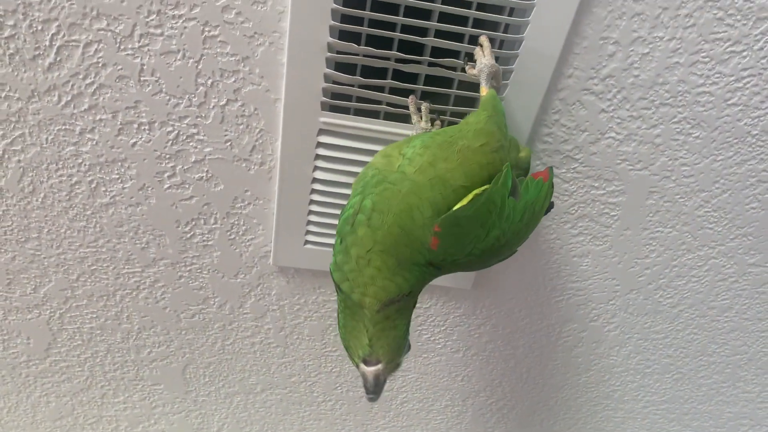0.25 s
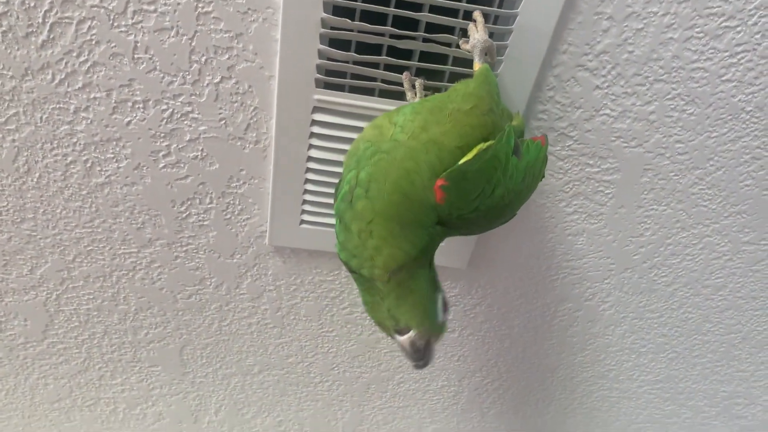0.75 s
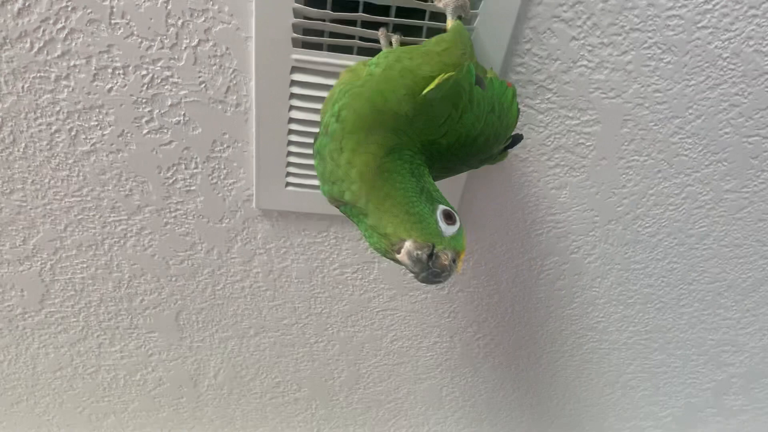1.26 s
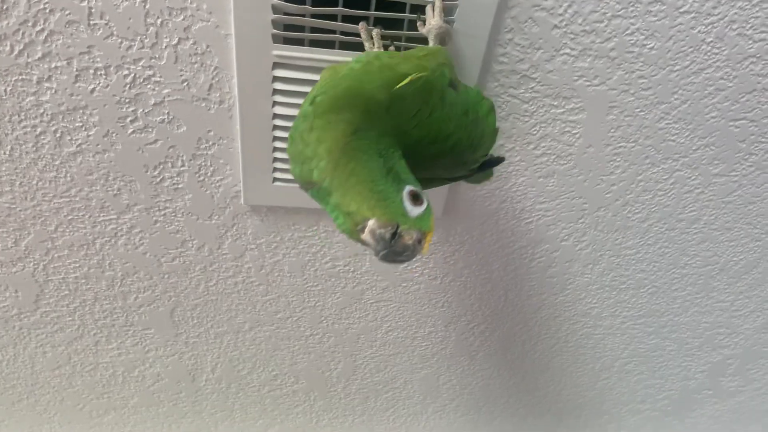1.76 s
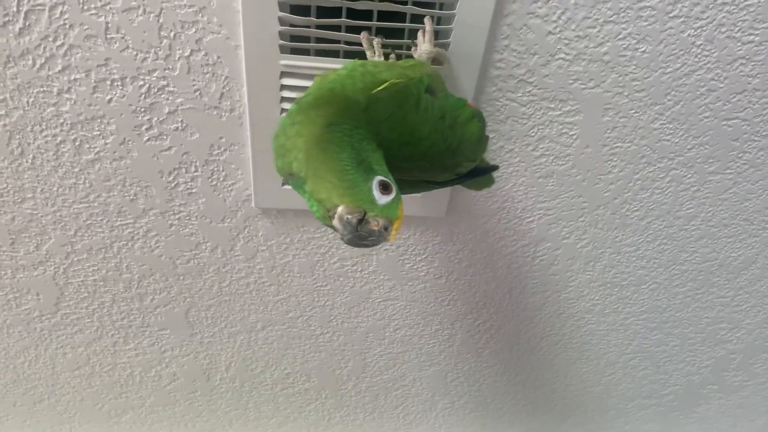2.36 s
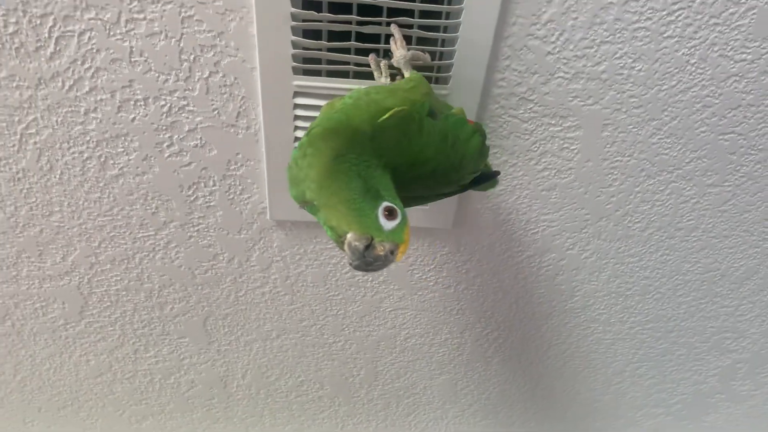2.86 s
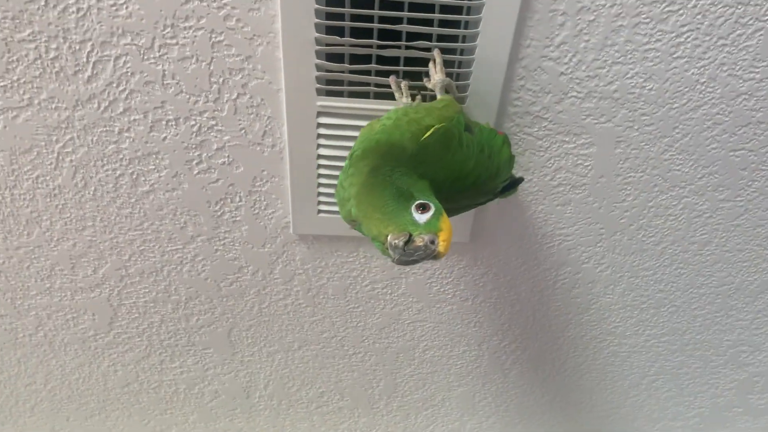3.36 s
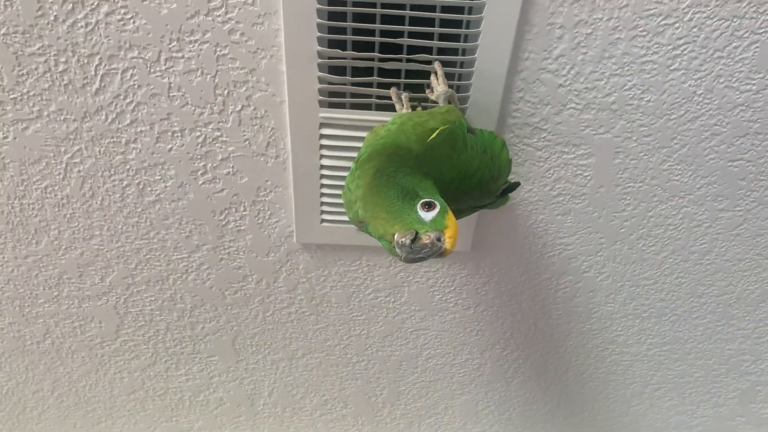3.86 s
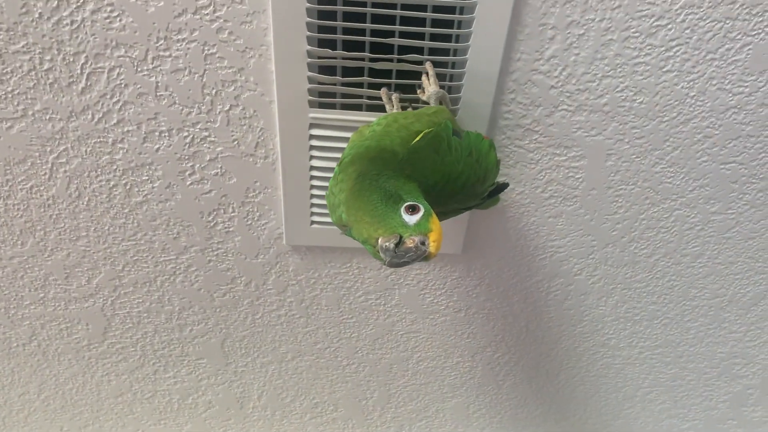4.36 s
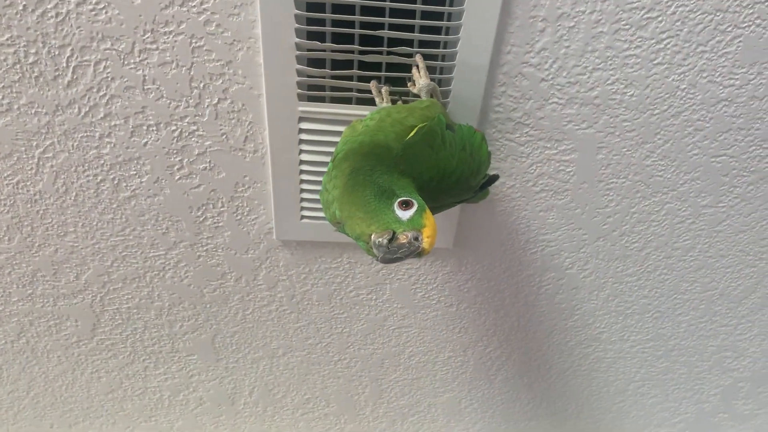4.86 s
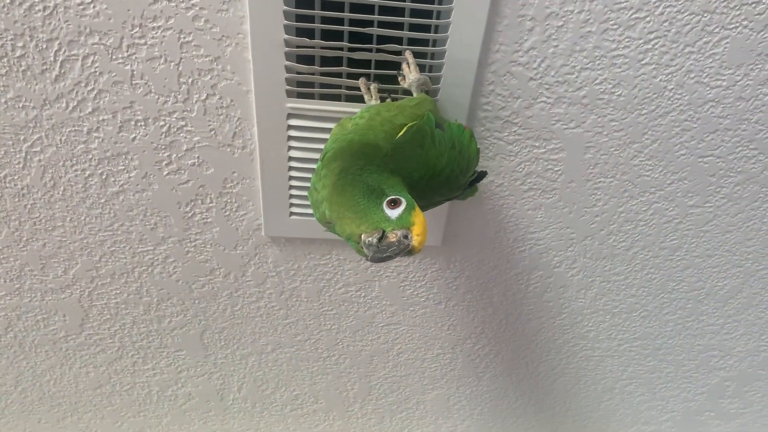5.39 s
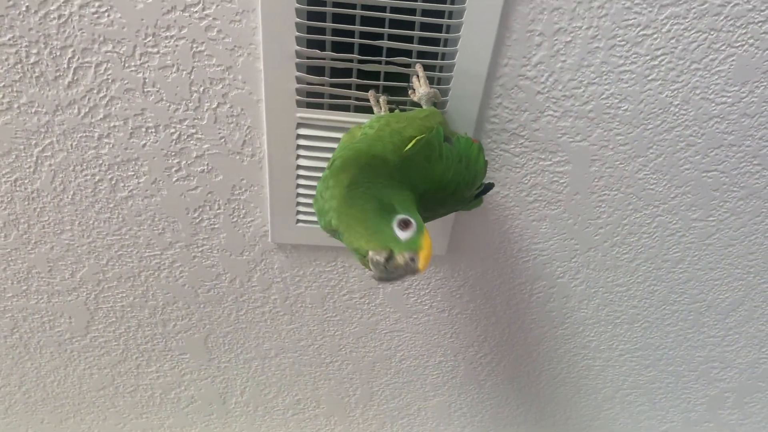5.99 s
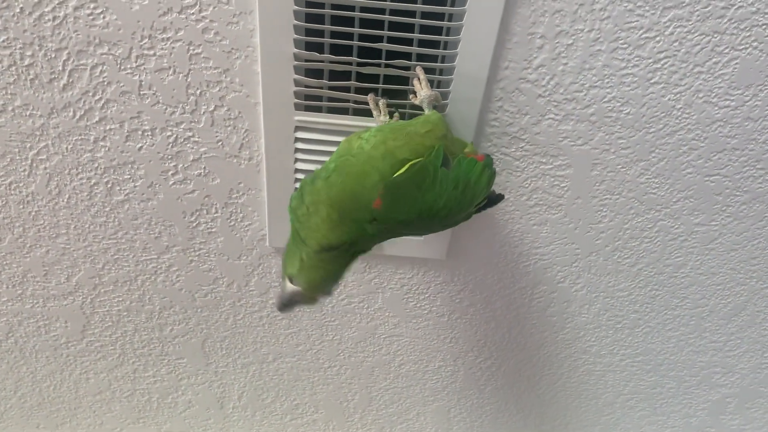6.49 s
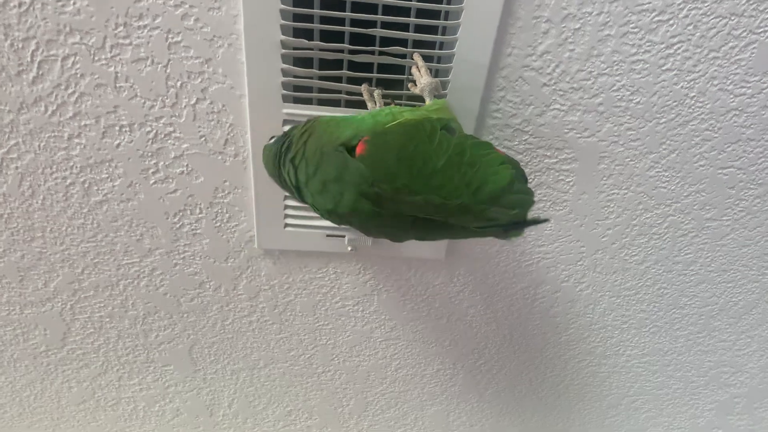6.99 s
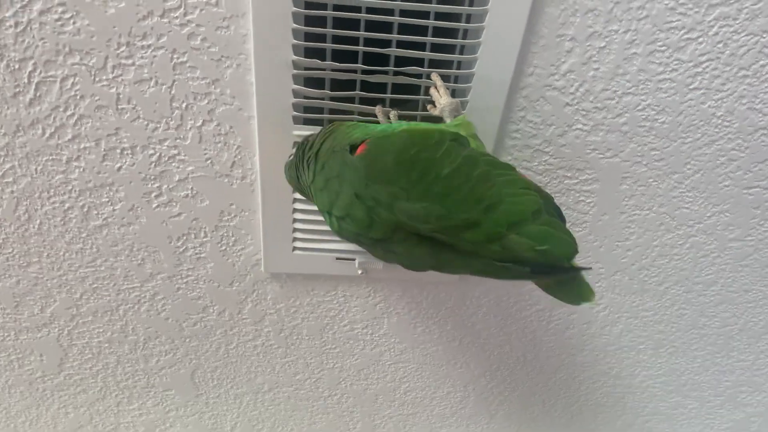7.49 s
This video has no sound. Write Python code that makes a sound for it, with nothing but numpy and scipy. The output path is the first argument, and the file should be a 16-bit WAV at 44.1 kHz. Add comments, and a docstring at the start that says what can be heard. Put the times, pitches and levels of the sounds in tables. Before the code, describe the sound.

A parrot's claws scrape, squeak and snap on a thin metal vent grille in a quiet room, then a fluttering rustle and dull bumps.

```python
"""Mains hum and the still air of a quiet room run throughout, under a parrot on a metal ceiling vent grille.
For the first 3.3 s its claws scrape along the bars and snap off them; the thin metal and the room ring briefly.
From 3.6 s to about 5.2 s a fluttering rustle passes, then come one more slide and a hard snap.
After 7 s there are dull bumps, light ticks and softer scrapes. A bump comes early too, near 1.7 s,
and a plucked bar sings faintly near 2 s and 5.3 s. Noise makes the contacts; tuned filters make the metal."""
import sys
import numpy as np
from scipy import signal
from scipy.fft import rfft, irfft, next_fast_len
from scipy.io import wavfile

SR = 44100
rng = np.random.default_rng(int(sys.argv[2]) if len(sys.argv) > 2 else 0)


def wav_record(signal):
    """Record a signal, one row per channel, as 16-bit PCM in the file named by sys.argv[1]."""
    frames = np.transpose(np.atleast_2d(signal))
    bounded = np.clip(frames, -1, 1)
    # unit amplitude maps onto the largest positive 16-bit level
    quanta = np.round(bounded * 32767).astype(np.int16)
    wavfile.write(sys.argv[1], SR, quanta)


N = 341334
TIME = np.arange(N) / SR


def from_db(db):
    """Turn decibels into a gain."""
    return 10 ** (np.asarray(db) / 20)


def rms_one(x):
    """Scale a sound to an rms level of 1."""
    return x / np.sqrt(np.mean(x ** 2) + 1e-20)


def at_hz(points, hz):
    """Read a table between its points, on a log-frequency axis."""
    f, value = np.transpose(points)
    return np.interp(np.log(hz + 0.0013), np.log(f), value)


def bins(size):
    """List the frequencies of a real FFT in Hz."""
    return np.fft.rfftfreq(size, 1 / SR)


def colour(x, *spectra):
    """Shape a noise by the sum of some dB spectra; the result has rms 1."""
    length = x.shape[-1]
    size = next_fast_len(length)
    gain = from_db(sum(at_hz(spectrum, bins(size)) for spectrum in spectra))
    return rms_one(irfft(rfft(x, size) * gain, size)[:, :length])


def noise(size):
    """Two unrelated noises: the sound both channels share, and the part in which they differ."""
    return rng.standard_normal((2, size))


def drift(per_s, size):
    """Wander in straight lines between random values of spread 1, drawn per_s times a second."""
    knots = rng.standard_normal(int(size / SR * per_s) + 3)
    return np.interp(np.arange(size) / SR * per_s, np.arange(len(knots)), knots)


def add(out, s, x):
    """Mix x into out from time s (seconds)."""
    i = max(round(s * SR), 0)
    out[:, i:i + x.shape[-1]] += x[..., :N - i]


# mains hum, before its waver: multiple of the mains frequency [1], level/dB rms
HUM_LINES = [(1, -55), (2, -65.5), (3, -64), (4, -82), (5, -86.5), (7, -85)]
# colour of the still air: f/Hz, level/dB per Hz
AIR_COLOUR = [(20, -17), (45, 0), (110, 3.5), (220, -4), (400, -11.5), (700, -20), (1400, -22),
              (3500, -27.5), (7000, -30.5), (15600, -33.5), (16300, -43.5)]
AIR_DB, MAINS_HZ = -67.5, 60


def background(waver_db=.7):
    """Mains hum is a stack of sines whose higher lines waver more; still air is a steady coloured noise."""
    out = from_db(AIR_DB) * colour(noise(N), AIR_COLOUR)
    for multiple, db in HUM_LINES:
        level = from_db(db + waver_db * multiple * drift(17, N))
        phase = 2 * np.pi * (round(multiple) * MAINS_HZ * TIME + rng.random())
        out[0] += np.sqrt(2) * level * np.sin(phase)   # sqrt(2): from rms to peak
    return out


# strength of the rustle, before its gains: t/s, rumble level/dB, hiss level/dB
RUSTLE_STRENGTH = [(3.68,-50.5,-62.5), (3.97,-51,-62), (4.17,-50.5,-55.5), (4.38,-49.5,-57),
                   (4.49,-56,-65.5), (4.6,-55,-60.5), (5.15,-60.5,-70)]
# colour of its low part: f/Hz, level/dB per Hz
RUMBLE_COLOUR = [(20, -15), (45, 3.5), (70, 3), (130, -11), (330, -10.5), (700, -18), (1500, -20),
                 (3500, -28), (6000, -68)]
# colour of its high part: f/Hz, level/dB per Hz
HISS_COLOUR = [(900, -10.5), (1800, 1.5), (3500, -0.5), (6000, -2), (8000, -10), (15000, -2.5),
               (16500, -20)]
# the gap between swells grows a little as the rustle dies away
RUSTLE_START_S, SWELL_GAP_S, SWELL_SLOWING_S = 3.68, 0.0917, 0.0012
# it sets in abruptly, one swell before its first peak
RUSTLE_ATTACK_S = 0.016


def rustle(rumble_gain_db=1.4, hiss_gain_db=0, hiss_width_s=0.047, lump_db=2.5, grain_db=1.5, count=15):
    """A lumpy rumble under a fine hiss; both swell about ten times a second, the rumble more broadly."""
    k, strength = np.arange(count), np.transpose(RUSTLE_STRENGTH)
    t = TIME[::40]   # a coarse clock is enough for slow swells
    peaks_s = RUSTLE_START_S + SWELL_GAP_S * k + SWELL_SLOWING_S * k ** 2

    def swells(column, width):
        """Add the power of all swells, each a smooth hump around its peak."""
        levels = np.interp(peaks_s, strength[0], strength[column])
        power = sum(from_db(2 * db) / (1 + ((t - s) / width) ** 2) ** 3 for s, db in zip(peaks_s, levels))
        onset = np.clip((t - RUSTLE_START_S + SWELL_GAP_S) / RUSTLE_ATTACK_S + .5, 0, 1)
        return np.interp(TIME, t, onset * np.sqrt(power))

    lumps = from_db(rumble_gain_db + lump_db * drift(60, N))
    rumble = colour(noise(N), RUMBLE_COLOUR) * swells(1, 1.5 * hiss_width_s) * lumps
    grain = from_db(hiss_gain_db + grain_db * drift(300, N))
    hiss = colour(noise(N), HISS_COLOUR) * swells(2, hiss_width_s) * grain
    return rumble + hiss


# dull bumps, before the tone and noise gains: t/s, knock level/dB, thud level/dB
DULL_BUMPS = [(1.695,-60.5,-46.5), (7.072,-38.5,-34), (7.165,-50.5,-43.5), (7.333,-51,-38),
              (7.44,-47.5,-42)]
# the hollow knock of the whole vent: f/Hz, level/dB against the knock, time to fade by 60 dB [s]
VENT_KNOCK = [(248, 0.5, .15), (905, -9.5, .22)]
# colour of the noise in a bump: multiple of its pitch [1], level/dB
THUD_COLOUR = [(.5, -8), (1, 0), (1.5, -6), (2.2, -22), (10, -55)]
THUD_DELAY_S, THUD_HZ, THUD_T60_S = .02, 83, .091


def bumps(tone_db=-2, dull_db=-6, rise_s=0.0049):
    """Soft, heavy contacts: fading sines and dull noise give a hollow knock, then a deeper thud."""
    out, t = np.zeros((2, N)), TIME[:SR // 4]
    for s, knock_db, thud_db in DULL_BUMPS:
        parts = [(0, hz, knock_db + db, t60) for hz, db, t60 in VENT_KNOCK]
        parts.append((THUD_DELAY_S, THUD_HZ, thud_db, THUD_T60_S))
        for delay, hz, db, t60 in parts:
            shape = from_db(db - 60 * t / t60) * (1 - np.exp(-t / rise_s))
            dull = colour(noise(len(t)), np.array(THUD_COLOUR) * [hz, 1])
            add(out, s + delay, from_db(dull_db) * shape * dull)
            add(out[:1], s + delay, from_db(tone_db) * shape * np.sin(2 * np.pi * hz * t))
    return out


# a claw plucks a loose bar: t/s, pitch f/Hz, level/dB before its flutter
BAR_PLUCKS = [(1.858, 1010, -66), (2.079, 1018, -67), (5.15, 1115, -66), (5.392, 1095, -60)]
# modes of that bar: multiple of its pitch [1], level/dB, time to fade by 60 dB [s]
LOOSE_BAR_MODES = [(1, 0, 1.1), (1.29, -3, .4), (1.87, -2, .4)]
GRIP_CHANGES_PER_S = 50


def plucks(flutter_db=3, waver=.006):
    """A plucked bar rings on unsteadily as the grip on it changes; its upper modes die first."""
    out, t = np.zeros((2, N)), TIME[:SR]
    for s, hz, db in BAR_PLUCKS:
        for multiple, mode_db, t60 in LOOSE_BAR_MODES:
            bend, flutter = drift(GRIP_CHANGES_PER_S, SR), drift(GRIP_CHANGES_PER_S, SR)
            phase = 2 * np.pi * np.cumsum(multiple * hz * (1 + waver * bend)) / SR
            level = from_db(db + mode_db + flutter_db * flutter - 60 * t / t60)
            add(out[:1], s, level * np.sin(phase))
    return out


# colour of any contact with the grille: f/Hz, level/dB per Hz
CONTACT_COLOUR = [(150, 4), (300, -5.5), (560, -4.5), (1000, 0), (1700, -1.5), (2700, 3.5), (4000, -1),
                  (6500, 0), (7500, -2.5), (8500, -1.5), (12500, 0.5), (14000, 1), (15500, -2.5),
                  (16500, -35)]
RAGGED_DB = 5   # depth of the peaks and dips in the colour of one contact


def contact_noise(size, body_db, edge_db, count=90):
    """The dense ring of the bars as noise; every place of contact favours other pitches."""
    place = np.c_[np.geomspace(400, 16000, count), RAGGED_DB * rng.uniform(-1, 1, count)]
    # body: lows against the middle; edge: highs against the middle
    balance = [(900, body_db), (2600, -0.34), (6000, 0.5), (12500, edge_db)]
    return colour(noise(size), CONTACT_COLOUR, place, balance)


# modes that stand out, before the changes per contact: f/Hz, level/dB, time to fade by 60 dB [s]
GRILLE_MODES = [(548, 3, 0.2), (629.4, 2.5, 0.16), (900, -5, 0.16), (1630, 3.5, 0.18), (1826, 1, 0.15),
                (1965, 0, 0.14), (2364, -2.5, 0.1), (2730, -3.5, 0.08), (3640, -4, 0.08), (5710, -3, 0.025),
                (6560, -3.5, 0.09), (6890, -1, 0.06), (11620, 0, 0.08)]
LOWEST_BAR_HZ, HIGHEST_BAR_HZ = 700, 15500
MODE_SPREAD_DB = 2.5   # how much each mode's strength changes from one contact to the next


def grille(x, struck=(), modes_db=2.0, detune=0.004, bars_db=0.5, bar_t60=0.035, direct_db=-2, count=44):
    """A contact rings the frame's modes (resonant filters) and a fresh crowd of short bar modes."""
    frame = [(hz * (1 + detune * rng.normal()), db + modes_db + MODE_SPREAD_DB * rng.normal(), t60)
             for hz, db, t60 in GRILLE_MODES]
    steps = (np.arange(count) + rng.random(count)) / count
    bar_hz = LOWEST_BAR_HZ * (HIGHEST_BAR_HZ / LOWEST_BAR_HZ) ** steps
    # high bar modes die sooner
    bars = [(hz, bars_db + MODE_SPREAD_DB * rng.normal(), bar_t60 * (3000 / hz) ** .5) for hz in bar_hz]
    out = from_db(direct_db) * x
    for hz, db, t60 in frame + bars + list(struck):
        r = from_db(-60 / (t60 * SR))   # what is left of the ring after one sample
        feed = [(1 - r * r) / 2, 0, (r * r - 1) / 2]
        ring = [1, -2 * r * np.cos(2 * np.pi * hz / SR), r * r]
        out += from_db(db) * signal.lfilter(feed, ring, x + 1e-18)
    return out


CATCH_DB = 8.5   # how much louder a contact gets when the claw snags


def catches(size, per_s=55, fade_s=0.0015):
    """Brief fading jolts of height 1 at random moments, where the claw snags on the paint."""
    jolts = 1e-18 + (rng.random(size) < per_s / SR)
    return np.minimum(signal.lfilter([1], [1, -np.exp(-1 / (fade_s * SR))], jolts), 1)


def squeak(hz, ms, sag_per_ms=0.0015, waver=0.012, rough_per_s=220):
    """The rough, narrow note of a rubbed bar; it wavers and sags as the claw travels."""
    size = len(ms)
    phase = 2 * np.pi * np.cumsum(hz * (1 - sag_per_ms * ms + waver * drift(60, size))) / SR
    note = drift(rough_per_s, size) * np.cos(phase) + drift(rough_per_s, size) * np.sin(phase)
    return np.outer([1, 0], rms_one(note))   # only in the shared sound


# a hard tap is a claw snapping off a bar, so a short slide leads into it
HARD_TAP_DB = -29
# the level of that slide is relative to the tap
LEAD_IN_DB, LEAD_IN_EDGE_DB, LEAD_IN_SWELL_MS, LEAD_IN_FADE_MS = -17.5, -8.5, 16, 1.4
LEAD_IN_SQUEAK_DB = -12


def lead_ins():
    """The slides that end in hard taps, as rows like those of the other slides."""
    return [(s, db + LEAD_IN_DB, LEAD_IN_EDGE_DB, LEAD_IN_SWELL_MS, LEAD_IN_FADE_MS, bar_hz, LEAD_IN_SQUEAK_DB)
            for s, db, _, _, _, bar_hz, *_ in CLAW_TAPS if db > HARD_TAP_DB]


# a claw slides along a bar: t/s of the peak, level/dB before the gain, edge (highs against the middle)
# level/dB, swell [ms], fade [ms], squeak f/Hz, squeak level/dB against the friction
CLAW_SLIDES = [(.527,-65,-21,9,18,2900,4.5), (1.316,-59.5,-21,31,38,2890,0), (1.37,-43,5.5,16,27,3400,-12),
               (1.548,-41.5,-7,18,12,2990,1), (2.046,-45.5,5,13,15,5685,-5.5),
               (2.246,-37,-0.5,26.4,25,2520,-10), (2.522,-60,-11,18,24,3365,-1.5),
               (2.668,-39.5,-2,22,22,3033,-5.5), (2.746,-42.5,0,22,21,2670,-12),
               (2.96,-39.5,0.5,13,18,3600,-13), (3.038,-46.5,-8.5,18,28,2930,-2),
               (3.169,-47,2,50,55,1900,-11), (5.148,-54,-3,26,71,2180,-11), (5.29,-55,-1,45,110,2050,-11),
               (5.415,-46,-6,14,28,2950,0), (5.95,-62,-25,33,47,2810,-12), (7.155,-55.5,-6,28,30,2585,-9),
               (7.258,-52,-4,30,34,2800,-3), (7.439,-58,-9,87,45,2585,-10), (7.58,-58.5,-8,30,40,2130,-1),
               (7.635,-38.5,0,22,28,4825,-21)]
# lows against the middle in a slide of typical length
SCRAPE_BODY_DB, TYPICAL_SWELL_MS = -15.5, 20
BODY_DB_PER_DOUBLING = 6   # a longer slide has more time to shake the lows of the frame


def scrapes(slips_per_s=450, slip_db=3, depth_db=17, gain_db=-4.5):
    """A claw slides in tiny uneven slips, catching now and then, and makes the bar squeak."""
    out = np.zeros((2, N))
    ms = np.arange(SR // 3) * 1000 / SR - 110   # the peak is at 0
    for s, db, edge_db, swell_ms, fade_ms, squeak_hz, squeak_db in CLAW_SLIDES + lead_ins():
        body_db = SCRAPE_BODY_DB + BODY_DB_PER_DOUBLING * np.log2(swell_ms / TYPICAL_SWELL_MS)
        away = np.minimum(np.maximum(-ms / swell_ms, ms / fade_ms), 6) ** 1.3
        level = db + gain_db - depth_db * away
        level = level + slip_db * drift(slips_per_s, len(ms)) + CATCH_DB * catches(len(ms))
        # the colour shifts as the claw travels from one place on the bar to the next
        travel = np.clip((ms + swell_ms) / (swell_ms + fade_ms), 0, 1)
        friction = sum(np.sqrt(share) * contact_noise(len(ms), body_db, edge_db)
                       for share in (1 - travel, travel))
        friction = friction + from_db(squeak_db) * squeak(squeak_hz, ms)
        add(out, s + ms[0] / 1000, grille(from_db(level) * friction))
    return out


# light ticks, single or in an uneven run, while the bird shifts its weight: start t/s, end t/s
WEIGHT_SHIFTS = [(.327, .4), (1.087, 1.2), (7.013, 7.6)]
TICK_GAP_S, TICK_JITTER_S, TICK_SPREAD_DB = .125, .03, 2.5
TICK_DB, TICK_BODY_DB, TICK_EDGE_DB = -62.5, -3, -6   # level before the taps' gain
TICK_BAR_HZ, TICK_RING_DB, TICK_SPREAD_OCTAVES = 2940, 14, .4


def ticks():
    """Light touches of the toes, as rows like those of the taps; the first of each span comes at its start."""
    rows = []
    for start, end in WEIGHT_SHIFTS:
        for s in np.arange(start, end, TICK_GAP_S):
            late, force, place = rng.uniform(-1, 1, 3)
            tick_s = s + TICK_JITTER_S * late * (s > start)
            db = TICK_DB + TICK_SPREAD_DB * force
            bar_hz = TICK_BAR_HZ * 2 ** (TICK_SPREAD_OCTAVES * place)
            rows.append((tick_s, db, TICK_BODY_DB, TICK_EDGE_DB, TICK_RING_DB, bar_hz))
    return rows


# claw and beak taps: t/s, level/dB before the gain, body (lows against the middle) level/dB,
# edge (highs against the middle) level/dB, ring of the struck bar level/dB, its main pitch f/Hz,
# then any further pitches f/Hz: most of the hardest taps have several
CLAW_TAPS = [(0.1095,-26.5,-14,-1.5,9,2850,6690,1960,11600), (1.2726,-55.5,-5,-8,11,3960),
             (1.3595,-47.5,-12,3,8,6900), (1.4349,-47,-12,3,11,2950), (1.4606,-37,-18.5,-1,9,4250,1650),
             (1.494,-36.5,-12.5,0.5,6.5,6400,8700), (1.561,-24.5,-16,5.5,4,6100,2370,3990,7660,12300),
             (1.6943,-21,-16,2,10.5,2530,1620,6560,11700), (1.8578,-46,-5.5,-10.5,14.5,3000,5940),
             (1.9536,-41.5,-19,5,9,5830), (2.0785,-47.5,-9.5,-12.5,12.5,3045,6100),
             (2.1225,-46,-18,-3,10,2900), (2.1924,-39.5,-19.5,1.5,6.5,4970),
             (2.2573,-22.5,-12,10,8,8900,2380,7070,1640), (2.2803,-29.5,-16.5,0.5,11,2950,2380,11930),
             (2.634,-43,-10,7,14,3000), (2.706,-24,-13,8,13,5690,4450,13400),
             (2.764,-29,-10,8,6.5,4825,7170), (2.9515,-44,-14,1,5,3300), (3.1006,-33.5,-19,6,5,7060),
             (3.2643,-22.5,-11.5,3.5,11,5720,1820,7200,13150), (5.3916,-23.5,-7,4,12,6890,1830,1630,6560),
             (5.913,-52,-8,-12,11,2794,6000), (7.0709,-43,-7.5,1,11,2780), (7.3284,-44.5,-8,5.5,10,6545),
             (7.3799,-43.5,-12.5,-21,8,3100,3900), (7.722,-54,-2,-3,9,3350)]
TAP_RISE_S, TAP_RING_T60_S, OVERTONE_T60_S = .0005, .11, .025


def taps(hold_s=0.009, steepness=3.3, ring_db=-19, grain_db=2, gain_db=-2.0, bar_t60=0.016, overtone_db=8):
    """A claw meets a bar: milliseconds of hard chatter and stray rattles, then a ring at its pitches."""
    out, t = np.zeros((2, N)), TIME[:SR // 7]
    burst = 1 / (1 + (t / hold_s) ** steepness)
    after_ring = from_db(ring_db - 60 * t / TAP_RING_T60_S)
    shape = np.hypot(burst, after_ring) * (1 - np.exp(-t / TAP_RISE_S))
    for s, db, body_db, edge_db, bar_db, bar_hz, *overtones in CLAW_TAPS + ticks():
        rattle_db = CATCH_DB * catches(len(t)) * (t > hold_s)
        level = from_db(db + gain_db + grain_db * drift(2500, len(t)) + rattle_db)
        chatter = level * contact_noise(len(t), body_db, edge_db)
        struck = [(bar_hz, bar_db, bar_t60)] + [(hz, overtone_db, OVERTONE_T60_S) for hz in overtones]
        add(out, s, grille(shape * chatter, struck))
    return out


# how long the room rings: f/Hz, time to fade by 60 dB [s]
ROOM_FADE = [(200, 0.24), (800, 0.38), (2100, 0.35), (5500, 0.3), (9000, 0.19), (15000, 0.25)]
# how strongly the room answers: f/Hz, level/dB
ROOM_ANSWER = [(200, 8), (800, 5), (2100, 0), (5500, -6), (9000, -6.5), (15000, -17.5)]


def room(x, gap_s=0.0011, build_s=0.002):
    """Diffuse reflections, as fading noise, build up just after the direct sound; each band has its own fade."""
    t = TIME[:SR * 3 // 5]
    white, hz, tail = rfft(noise(len(t))), bins(len(t)), 0
    centres = np.array(ROOM_FADE)[:, 0]
    for share, (f, t60) in zip(np.eye(len(centres)), ROOM_FADE):
        decay = from_db(-60 * t / t60) * (1 - np.exp(-np.maximum(t - gap_s, 0) / build_s))
        band = at_hz(np.c_[centres, share], hz) * from_db(at_hz(ROOM_ANSWER, hz))
        tail = tail + irfft(white * band, len(t)) * decay / np.linalg.norm(decay)
    return signal.fftconvolve(x, tail, axes=1)[:, :N]


# how alike the two channels sound: f/Hz, likeness from 0 to 1 [1]
CHANNEL_LIKENESS = [(60, .99), (150, .95), (300, .8), (700, .52), (1500, .62), (3000, .82), (5000, .96)]
# phase by which the left channel leads (negative: lags): f/Hz, phase [radians]
LEFT_LEAD = [(0, 0), (340, -.3), (1700, -4.4), (2410, -3.2), (3700, -4.6), (4700, -3.2), (15200, 12.5),
             (16500, 12.6)]
# balance of the channels: f/Hz, left minus right level/dB
LEFT_BALANCE = [(60, -1.2), (160, -2.4), (500, -1.2), (1100, -2.4), (2500, -.4), (5000, 0)]


def ports(x):
    """Two sound ports, left and right, hear nearly the same sound, with level and phase varying by pitch."""
    size = next_fast_len(N + SR // 4)
    hz, (common, apart) = bins(size), rfft(x, size)
    alike = np.clip(at_hz(CHANNEL_LIKENESS, hz), 0, 1)
    common, apart = common * np.sqrt((1 + alike) / 2), apart * np.sqrt((1 - alike) / 2)
    tilt = from_db(at_hz(LEFT_BALANCE, hz) / 2)
    lead = np.interp(hz, *np.transpose(LEFT_LEAD))
    left = (common + apart) * tilt
    right = (common - apart) / tilt * np.exp(-1j * lead)
    return irfft([left, right], size)[:, :N]


def scene():
    """The bird on the grille in its room, with the close and steady sounds added without the room."""
    bird = taps() + scrapes() + plucks()
    return ports(bird + room(bird) + bumps() + rustle() + background())


CUTOFF_HZ = 16500


def record(dry):
    """A steep low-pass filter, run forwards and backwards, cuts the top."""
    lowpass = signal.ellip(10, .05, 60, CUTOFF_HZ, fs=SR, output="sos")
    return signal.sosfiltfilt(lowpass, dry)


dry = scene()
out = record(dry)
wav_record(out)
```